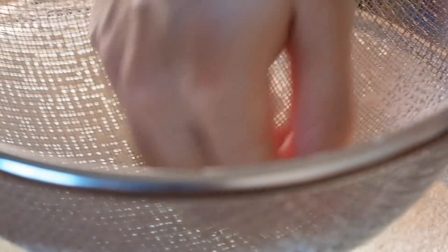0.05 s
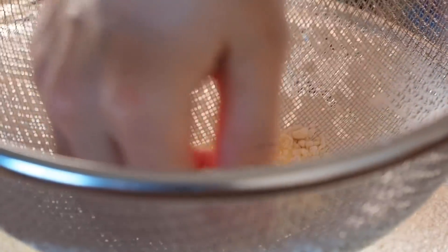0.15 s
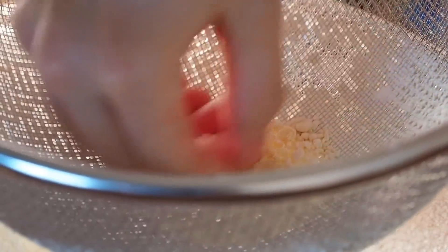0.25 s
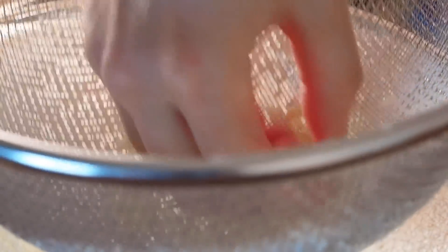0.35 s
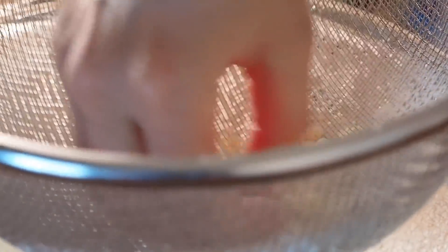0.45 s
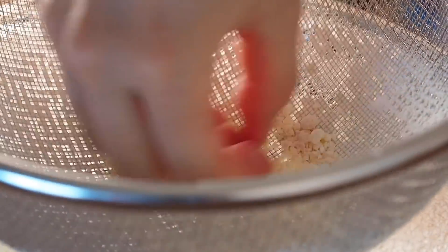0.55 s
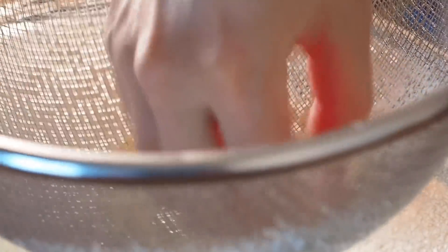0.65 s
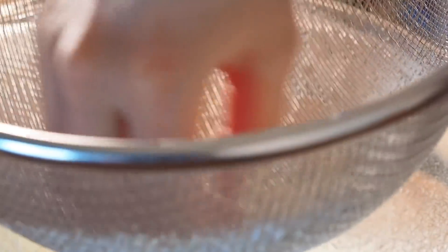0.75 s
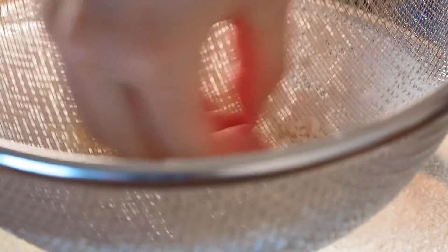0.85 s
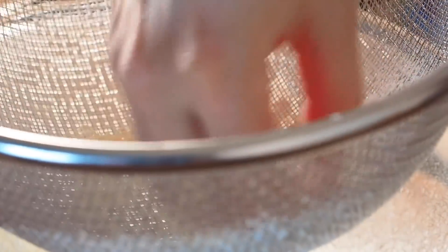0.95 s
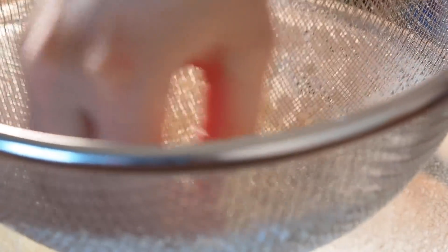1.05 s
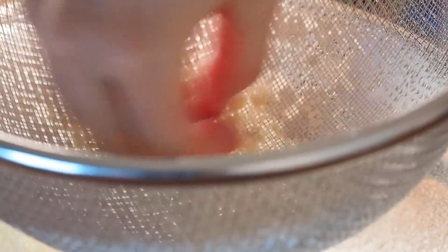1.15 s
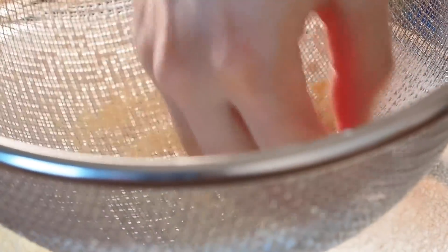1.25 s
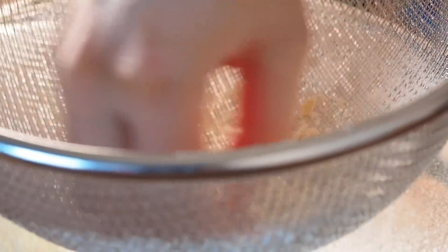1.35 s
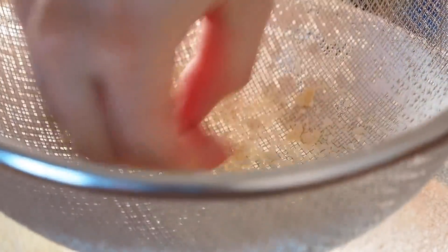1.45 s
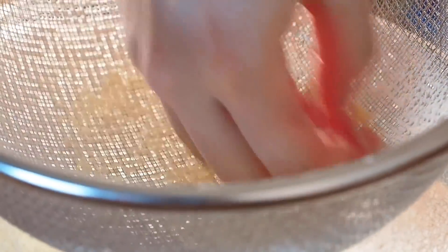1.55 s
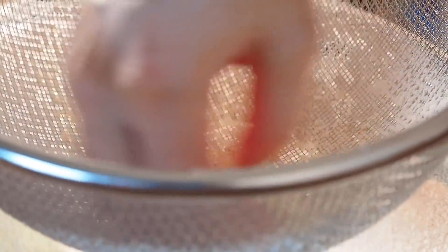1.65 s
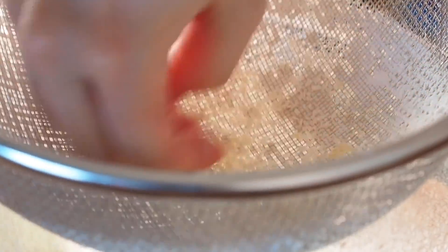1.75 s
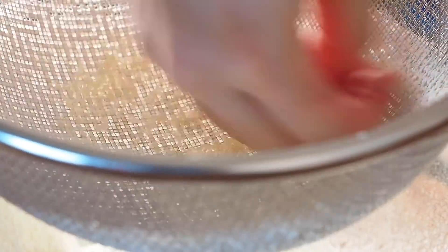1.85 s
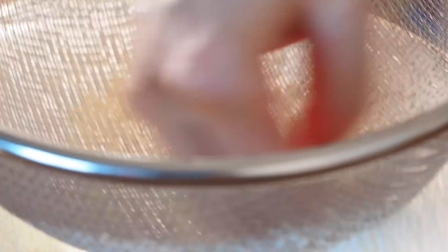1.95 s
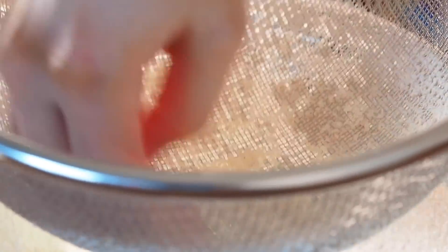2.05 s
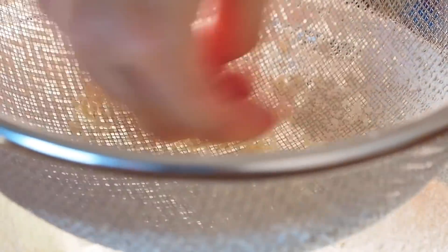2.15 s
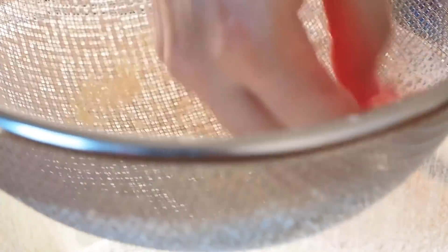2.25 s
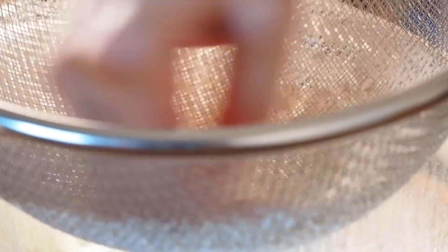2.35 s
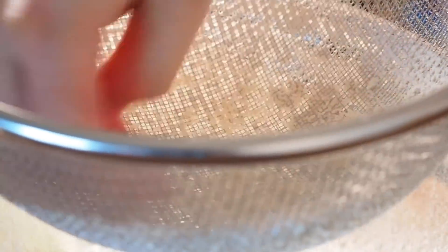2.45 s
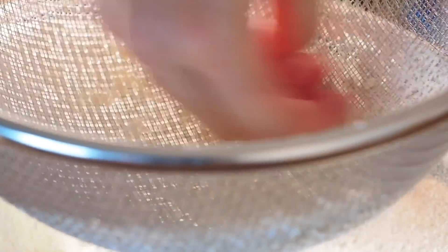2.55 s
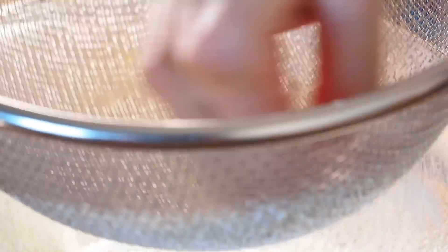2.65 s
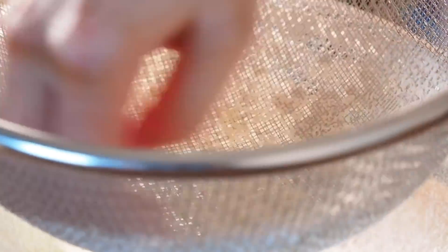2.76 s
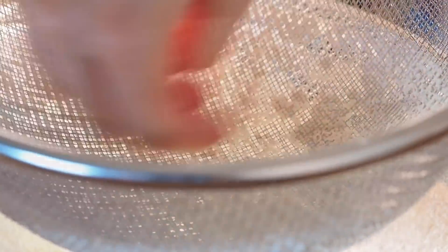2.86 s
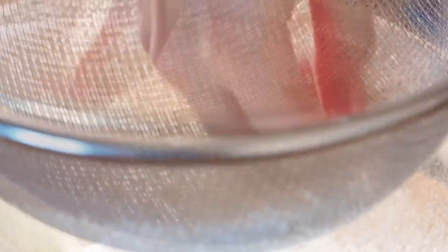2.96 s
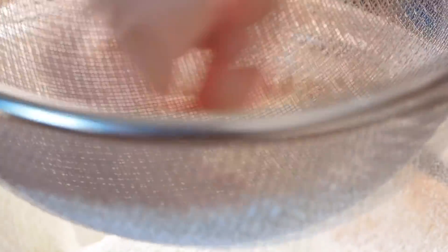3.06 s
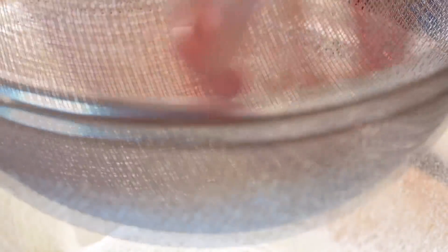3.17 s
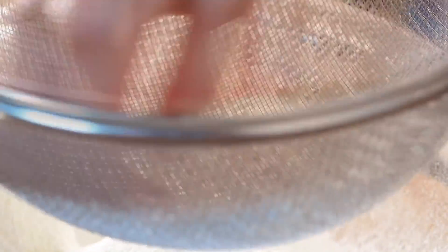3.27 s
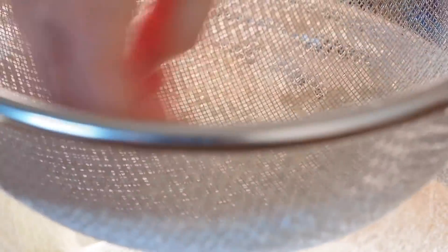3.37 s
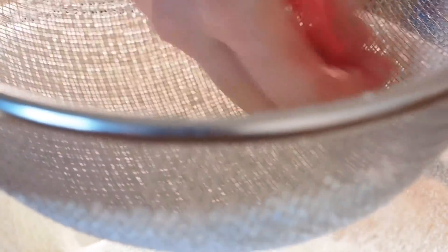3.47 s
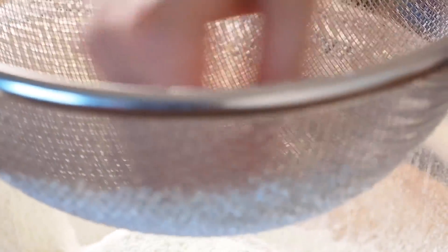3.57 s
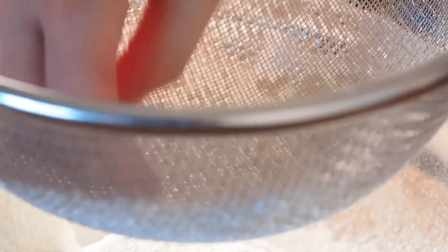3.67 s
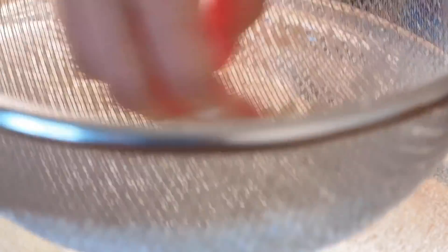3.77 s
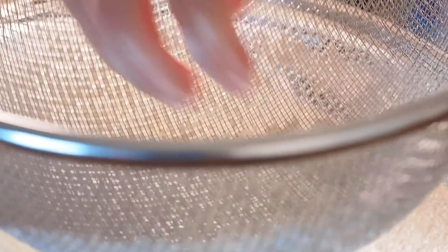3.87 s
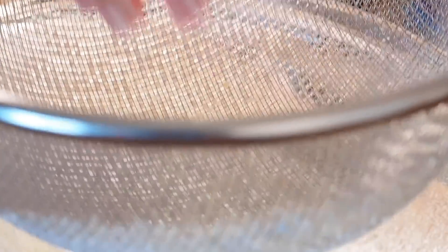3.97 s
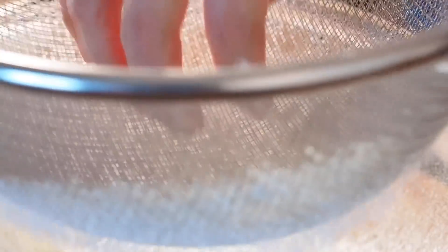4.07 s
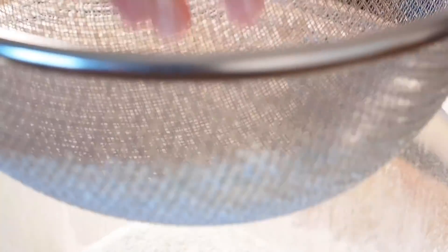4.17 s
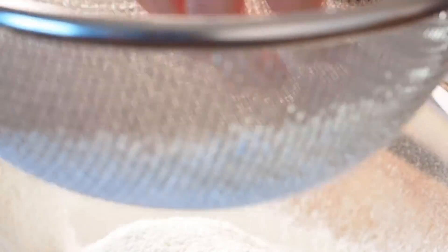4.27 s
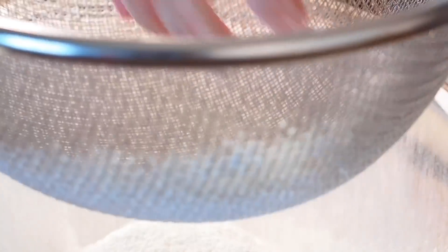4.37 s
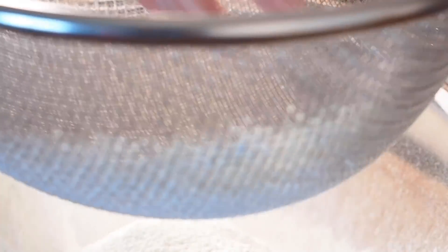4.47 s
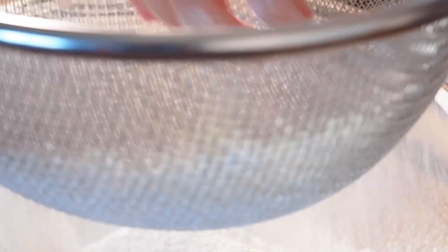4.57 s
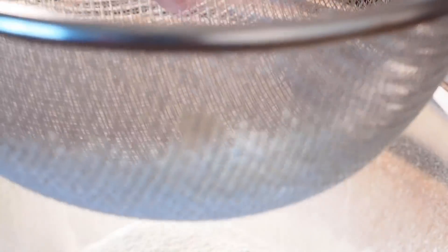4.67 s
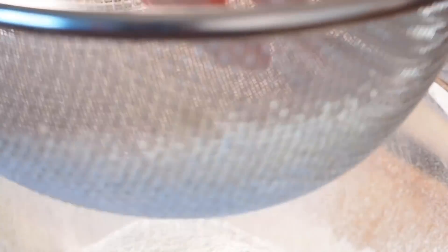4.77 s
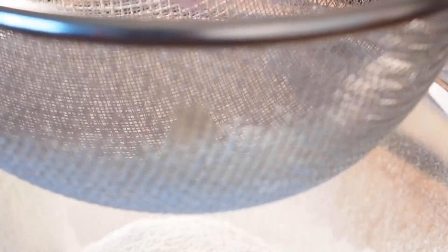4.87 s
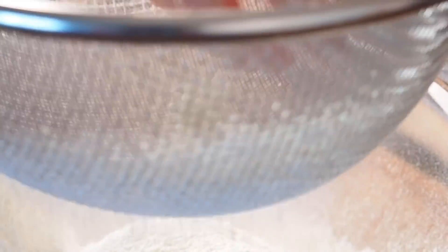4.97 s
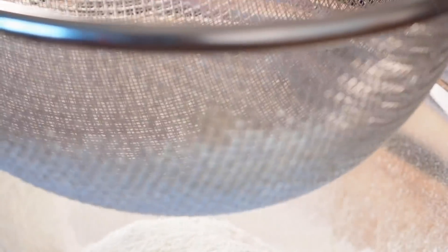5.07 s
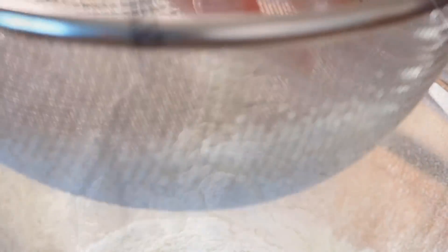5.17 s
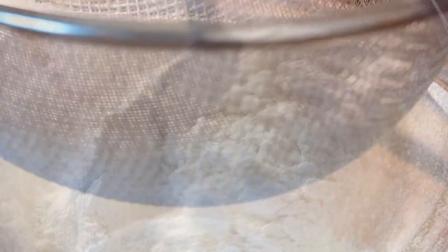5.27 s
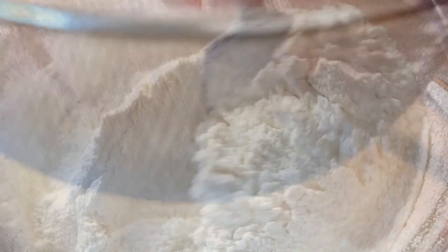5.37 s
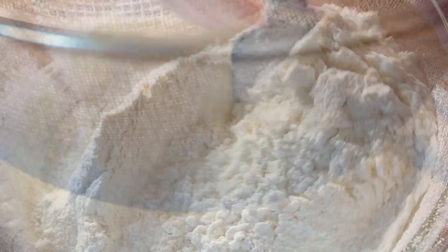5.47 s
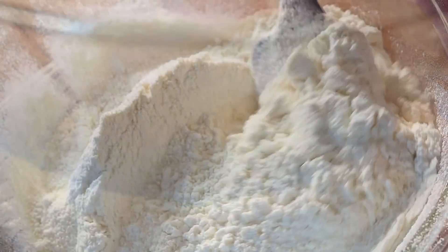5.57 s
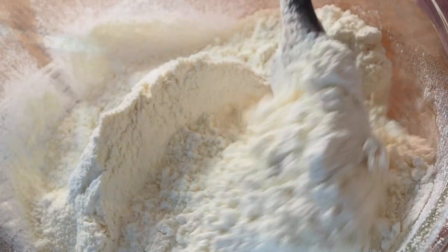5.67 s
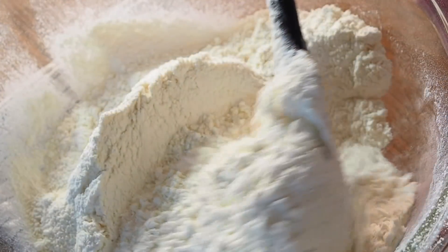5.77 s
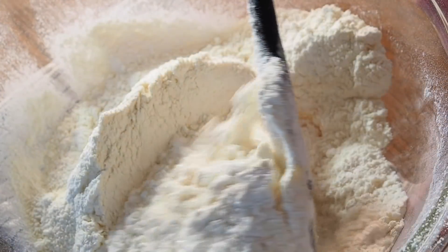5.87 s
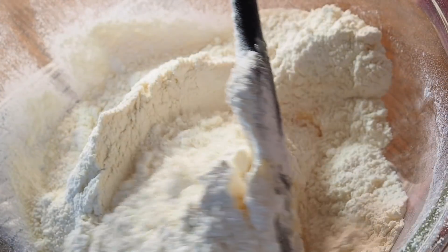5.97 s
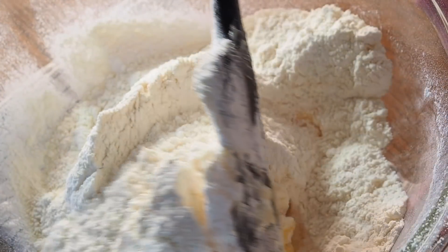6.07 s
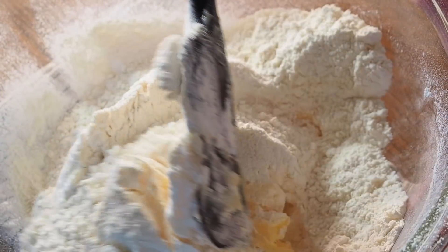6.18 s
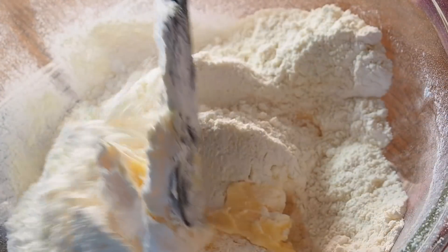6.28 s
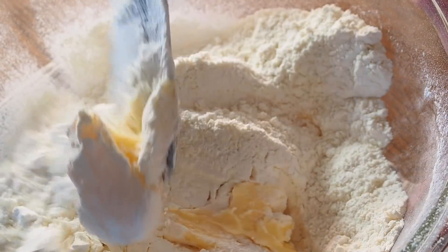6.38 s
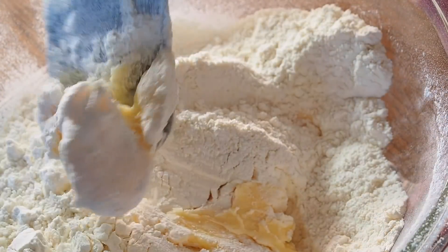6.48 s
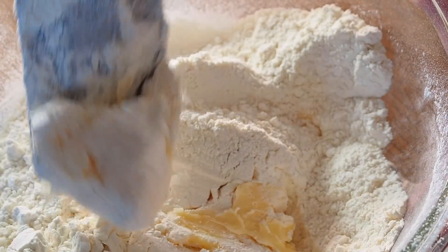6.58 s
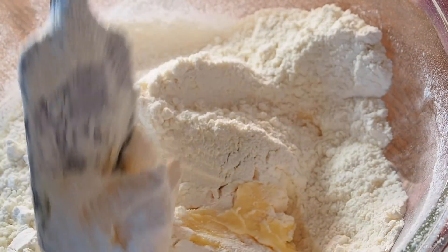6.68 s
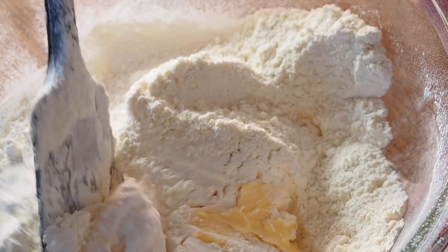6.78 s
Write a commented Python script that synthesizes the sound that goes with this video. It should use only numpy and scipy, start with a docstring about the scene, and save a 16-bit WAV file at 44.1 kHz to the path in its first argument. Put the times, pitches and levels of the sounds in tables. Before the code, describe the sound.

In a quiet kitchen, fingers rub the last lumps of flour through a fine wire sieve, very close to the microphone. About three soft strokes a second rasp, hiss and faintly buzz across the mesh. Then a hand pats the sieve nine times, louder and evenly, each a low thump with a crisp wire chatter. Powder sifts down faintly, and a spatula makes a few tiny scrapes.

```python
"""In a quiet kitchen, fingers rub the last lumps of flour through a fine wire sieve, very close by.
Sliding makes the mesh hiss, crushed flour rasps, and skin plucks the wires into a buzz.
Then a hand pats the sieve nine times: each pat pushes air, swings the mesh and makes its wires chatter.
Flour trickles down, and a few faint touches follow as a spatula starts to fold it into the batter."""
import sys
import numpy as np
from scipy import signal
from scipy.fft import rfft, irfft
from scipy.io import wavfile
from scipy.ndimage import uniform_filter1d

SR = 44100
rng = np.random.default_rng(int(sys.argv[2]) if len(sys.argv) > 2 else 0)


def int16_out(signal):
    """Quantize to a 16-bit WAV file."""
    q = np.round(np.clip(np.atleast_2d(signal).T, -1, 1) * 32767)
    wavfile.write(sys.argv[1], SR, q.astype(np.int16))


N = 301187
T = np.arange(N) / SR

# Firm pushes of the fingers across the mesh:
# start_s, hold_s, release_s, rasp_db, hiss_db, buzz_db, first_wires_per_s, slowing_octaves_per_s
PUSHES = [(.092, 0.047, 0.019, -60.5, -56, -43.5, 285, 0.66),
          (0.636, 0.031, 0.026, -49, -50, -43.5, 322, 0.26),
          (0.894, 0.066, 0.05, -48, -48.5, -48, 500, 13.5),
          (1.204, 0.078, 0.054, -47.5, -45.5, -50.5, 544, 7.6),
          (1.55, 0.036, 0.051, -46, -43.5, -46.5, 524, 11), (1.848, 0.046, 0.042, -46, -42, -51, 730, 8),
          (2.197, 0.058, 0.058, -47.5, -42, -42, 820, 15), (2.583, 0.047, 0.048, -49, -41, -44, 680, 15),
          (2.919, 0.052, 0.031, -47.5, -42, -49, 720, 7.4),
          (3.434, 0.063, 0.033, -48.5, -38.5, -42, 810, 8.8),
          (3.763, 0.059, 0.0048, -47.5, -40.5, -39, 740, 5)]
# Light drags between the pushes: start_s, length_s, rasp_db, hiss_db, buzz_db, wires_per_s
DRAGS = [(0.588, 0.064, -57.5, -56.5, -38, 178), (1.051, 0.24, -88, -66, -59.5, 373),
         (1.056, 0.076, -84, -83, -44.5, 82), (1.771, 0.047, -62.5, -75, -45.5, 320),
         (1.94, 0.13, -75, -46, -68, 540), (2.05, 0.065, -65, -43, -68, 520),
         (2.078, 0.12, -61.5, -54, -54.5, 390), (2.374, .14, -86, -48, -59, 310),
         (2.763, 0.12, -60.5, -43, -67, 450), (3.069, 0.16, -54.5, -67, -51, 560),
         (3.233, .15, -57.5, -49.5, -40, 171), (3.55, 0.095, -57.5, -40, -47.5, 450),
         (3.645, 0.14, -63.5, -59, -47.5, 93), (3.736, .09, -58, -50.5, -46, 290)]
# Pats of the hand on the sieve:
# start_s, chatter_db, thump_db, knock_db, swing_db, chatter_decay_s, powder_db, thump_lead_s
PATS = [(4.1072, -25.5, -12, -30, -19.5, 0.0037, -83, 0.00041),
        (4.341, -21, -13.5, -27, 2.5, 0.00075, -65, -0.0014),
        (4.574, -22.5, -14, -35, 1, 0.0011, -65, 0.0015),
        (4.7938, -24, -15.5, -34.5, 0.5, 0.002, -71.5, 0.0018),
        (5.0046, -18.5, -17, -31, 2.5, 0.00087, -62, 0.00068),
        (5.2155, -23, -17, -33, 2.5, 0.0017, -69.5, 0.00072),
        (5.4282, -22.5, -17.5, -34.5, 2, .0027, -65, .0005),
        (5.6439, -23, -19.5, -38.5, 0.5, 0.0018, -62, -0.0009),
        (5.8628, -36.5, -31.5, -50, -2.5, 0.002, -100, 0.0038)]
SWING_HZ = 100.5  # the mesh swings to and fro after a pat


def undb(db):
    """Turn decibels into a gain to multiply by."""
    return 10 ** (np.asarray(db) / 20)


def unit(x):
    """Scale a signal to an average strength (rms) of 1."""
    return x / np.sqrt(np.mean(x ** 2))


def curve(rows):
    """Join rows of time_s, value with straight lines."""
    return np.interp(T, *np.transpose(rows))


def colour(x, points):
    """Shape the tone of a sound by rows of pitch_hz, level_db."""
    hz, db = np.transpose(points)
    bins = np.maximum(np.fft.rfftfreq(N, 1 / SR), 1)
    return irfft(rfft(x) * undb(np.interp(np.log(bins), np.log(hz), db)), N)


def resonate(x, hz, width_hz):
    """Let a sound ring around one pitch."""
    return signal.lfilter(*signal.iirpeak(hz, hz / width_hz, SR), x)


def wander(rate):
    """A smooth random wobble of size 1 that changes about rate times a second."""
    span = max(int(SR / rate), 1)
    return unit(uniform_filter1d(uniform_filter1d(rng.standard_normal(N), span), span))


def grains(spread_db):
    """Noise of many tiny slips; more spread makes their sizes less equal."""
    return unit(rng.standard_normal(N) * undb(spread_db * wander(1500)))


def stereo_noise(tone, spread_db=0):
    """Shaped noise, alike left and right in the middle range and unrelated in the treble."""
    # Strength of the left-right contrast against the shared sound: pitch_hz, level_db
    width = [(60, -6), (200, -0.5), (700, -9.5), (2400, -18), (4400, -8), (8000, -2.5), (15000, -0.5)]
    mid, side = (unit(colour(grains(spread_db), tone)) for _ in range(2))
    side = colour(side, width)
    return np.array([mid + side, mid - side])


def pan(db):
    """Two gains that make the left louder than the right by db."""
    return undb(np.array([[db], [-db]]) / 2)


def burst(t, rise_s, decay_s):
    """A loudness shape that grows up to t = 0 and dies away after it."""
    return np.exp(-np.minimum(np.maximum(-t / rise_s, t / decay_s), 20))


def arch(start, length):
    """A smooth swell from 0 to 1 and back."""
    return np.sin(np.pi * np.clip((T - start) / length, 0, 1))


def scrapes(rows, noise, width_hz):
    """Short swells of ringing noise, from rows of start_s, length_s, pitch_hz, level_db."""
    return sum(unit(resonate(resonate(noise, hz, width_hz), hz, width_hz))
               * undb(db) * arch(start, length) for start, length, hz, db in rows)


def room(x, wet_db, fade_s, gap_s=0.0068, treble_hz=11000):
    """Add the echo of bowl, worktop and walls; it is duller and falls 60 dB in fade_s."""
    t = T[:SR // 2]
    tail = rng.standard_normal((2, len(t))) * undb(-60 * t / fade_s) * (t > gap_s)
    tail /= np.sqrt(np.sum(tail ** 2, axis=1, keepdims=True))
    tail = signal.lfilter(*signal.butter(2, treble_hz, fs=SR), tail)
    return x + undb(wet_db) * signal.fftconvolve(x, tail, axes=1)[:, :N]


def kitchen(hum_hz=147, hum_db=-80, noise_db=-63):
    """Quiet room noise, a wavering hum, and a low rumble of air stirred by the hand."""
    # Tones of the still room and of the moving air: pitch_hz, level_db
    room_tone = [(18, -33), (30, 12), (58, -2.5), (95, -29.5), (161, -15), (233, -23.5), (364, -21),
                 (554, -28.5), (616, -25.5), (1460, -38), (11400, -48.5), (12600, -52), (16000, -63)]
    air_tone = [(8, 7.5), (22, -7.5), (40, -16), (80, -19), (150, -25.5), (400, -36), (1500, -81.5)]
    # Strength of the moving air: time_s, level_db
    draught = [(0, -47), (1.2, -50.5), (2.5, -49.5), (3.2, -41.5), (3.9, -47), (5.6, -49), (5.95, -69.5),
               (6.8, -76)]
    hum_size = np.sqrt(2) * undb(hum_db + 6.2 * wander(23))
    hum = hum_size * np.sin(2 * np.pi * hum_hz * T + 0.81 * wander(10))
    still = stereo_noise(room_tone) * undb(noise_db) + hum
    return still * pan(-3.5) + stereo_noise(air_tone) * undb(curve(draught))


def dull_bumps():
    """A dull low thump comes as the sound starts; the later ones are the hand bumping the mesh."""
    # Dull low thumps: start_s, length_s, level_db
    bumps = [(0.002, 0.032, -27), (0.226, 0.017, -39.5), (0.619, 0.021, -27.5), (1.498, 0.068, -35),
             (2.093, 0.015, -40), (3.828, 0.019, -32), (5.078, 0.012, -37), (5.517, 0.026, -31.5),
             (5.574, 0.022, -40)]
    return sum(undb(db) * arch(start, length) ** 2 for start, length, db in bumps)


def push_shape(start, hold_s, release_s, attack_s=0.016):
    """The effort of one push sets in, holds and dies away."""
    t = T - start
    return np.clip(t / attack_s, 0, 1) * np.exp(-np.clip((t - hold_s) / release_s, 0, 20))


def finger_effort(turn_lead_s=0.046, turn_s=0.023, turn_db=-2.5, hiss_lingers=2.06):
    """Resting contact, pushes and drags add up to a sliding level and a pressing level, in dB."""
    # Hiss of fingers resting on the mesh, growing as the flour clears until they lift: time_s, level_db
    contact = [(0, -69), (.22, -71.5), (.31, -63), (.52, -66), (.85, -60), (1.5, -60.5), (2.55, -52),
               (3.2, -42.5), (3.82, -49), (3.95, -110)]
    # The hand turns round just before each push, and the hiss dips.
    turning = sum(arch(start - turn_lead_s, turn_s) for start, *_ in PUSHES)
    slide = undb(curve(contact) + turn_db * turning) ** 2
    press = slide * undb(-17) ** 2  # resting fingers barely rasp
    for start, hold_s, release_s, rasp_db, hiss_db, *_ in PUSHES:
        slide += (undb(hiss_db) * push_shape(start, hold_s, release_s * hiss_lingers)) ** 2
        press += (undb(rasp_db) * push_shape(start, hold_s, release_s)) ** 2
    for start, length, rasp_db, hiss_db, *_ in DRAGS:
        swell = arch(start, length)
        slide += (undb(hiss_db) * swell) ** 2
        press += (undb(rasp_db) * swell) ** 2
    return 10 * np.log10(slide), 10 * np.log10(press)


def rubbing(press_share=0.49):
    """Sliding makes the wires hiss, pressing crushes flour into a rasp, and both ring the bowl."""
    # Tones of the hissing wires and the rasping flour: pitch_hz, level_db
    hiss_tone = [(150, -11.5), (400, -7.5), (900, -24.5), (1150, -22), (1400, -33.5), (2100, -22.5),
                 (3000, -13.5), (5600, -14.5), (6900, -4), (8000, -2), (9800, -7), (11000, -10.5),
                 (11900, -9.5), (13000, -14.5), (16000, -19.5)]
    rasp_tone = [(80, -28), (200, 1), (330, 4.5), (700, 4), (1150, 5), (1350, -7), (1700, -2), (2600, -0.5),
                 (4200, -5), (7000, -19), (14000, -50)]
    # Ringing of the sieve's bowl and rim: pitch_hz, width_hz, level_db
    bowl_rings = [(375, 80, -5), (666, 50, 0), (1050, 80, -7), (1140, 60, 0), (1545, 30, -10),
                  (1680, 70, -12)]
    slide_db, press_db = finger_effort()
    buzz, plucks, overtones = wire_buzz()
    catch_db = 2 * wander(220) + 2 * plucks  # the skin catches and lets go
    hiss = stereo_noise(hiss_tone, spread_db=1) * undb(slide_db + catch_db / 2) * pan(0.42)
    rasp = stereo_noise(rasp_tone, spread_db=1.5) * undb(press_db + 1 + catch_db) * pan(-0.67)
    slips = grains(spread_db=5.6)
    ringing = unit(sum(undb(db) * resonate(slips, hz, width) for hz, width, db in bowl_rings))
    bowl = ringing * undb(press_share * press_db + (1 - press_share) * slide_db - 4) * pan(-3.5)
    overtones *= undb(press_db + 1)
    return hiss + rasp + bowl + buzz + overtones + scratches(rasp_tone) + lump_crunch()


def lump_crunch(pitch_hz=1830, lead_s=0.009, peak_s=1.5, fade_db_per_s=3.5):
    """Each push starts by crushing lumps: more as they gather, fewer as they run out."""
    rows = []
    for start, hold_s, _, rasp_db, *_ in PUSHES:
        level_db = rasp_db - 1.5 - fade_db_per_s * abs(start - peak_s)
        rows.append((start - lead_s, 1.37 * hold_s, pitch_hz, level_db))
    grit = stereo_noise([(1000, 0.018), (4000, 0)], spread_db=4.5)
    return scrapes(rows, grit, width_hz=1350)


def finger_glides(grip_s=0.0014, slowest_hz=226, judder_below_hz=230, waver=0.06, judder=0.56):
    """Give each move's swell, wires per second, level and unsteadiness; pushes slow, drags speed up."""
    for start, hold_s, release_s, _, _, db, hz, slowing in PUSHES:
        rate = hz * 2 ** (-slowing * np.maximum(T - start, 0))
        swell = arch(start + grip_s, hold_s + 1.77 * release_s)
        yield swell, np.maximum(rate, slowest_hz), db, waver
    for start, length, _, _, db, hz in DRAGS:
        from_middle_s = np.clip(T - start, 0, length) - length / 2
        rate = hz * 2 ** (1.5 * from_middle_s)  # up 1.5 octaves a second
        unsteady = judder if hz < judder_below_hz else waver  # slow skin sticks and slips
        yield arch(start, length), rate, db, unsteady


def wire_buzz(flutter_db=3.5, bowl_top_hz=1245):
    """Skin plucks one wire after another, giving a buzz, a plucking rhythm and rough overtones."""
    tone, plucks = 0, 0
    wobble = wander(251.6)
    roughness = [wander(260) for _ in range(2)]
    for swell, hz, db, unsteady in finger_glides():
        phase = 2 * np.pi * np.cumsum(hz * np.exp(unsteady * wobble)) / SR
        tone += undb(db) * swell * np.sin(phase)
        plucks += swell * np.exp(1j * phase)  # one turn for each wire crossed
    overtones = sum(np.abs(plucks) * noise * np.cos(multiple * np.angle(plucks))
                    for multiple, noise in enumerate(roughness, 2))
    overtones = signal.lfilter(*signal.butter(6, bowl_top_hz, fs=SR), overtones)  # the bowl dulls them
    buzz = tone * undb(flutter_db * wander(147)) * pan(-4.5)
    return buzz, np.real(plucks), overtones


def scratches(tone, pitch_hz=3530, lag_s=0.015):
    """The fingers make a thin scratch as each push eases, and all through each drag."""
    easing = [(start + hold_s + lag_s, 2.03 * release_s, pitch_hz, hiss_db - 13)
              for start, hold_s, release_s, _, hiss_db, *_ in PUSHES]
    dragging = [(start, length, pitch_hz, hiss_db - 14) for start, length, _, hiss_db, *_ in DRAGS]
    return scrapes(easing + dragging, stereo_noise(tone), width_hz=1500)


def pat_thumps(puff_s=0.0038, backflow_s=0.045, swing_fade_s=0.053):
    """Each pat pushes a puff of air that flows back slowly; mesh and frame swing briefly."""
    # Ringing of the sieve's frame: pitch_hz, level_db, fade_s (time to fall 60 dB)
    frame_rings = [(161.4, -12, 0.051), (195, -20.5, 0.1), (259, -29, 0.026)]
    t = T[:SR // 4]
    puff = undb(-3) * (t / puff_s * np.exp(1 - t / puff_s)) ** 2
    backflow = undb(-13) * arch(puff_s, backflow_s)[:len(t)] ** 2 * pan(6.3)
    frame = sum(undb(db - 60 * t / fade_s) * np.sin(2 * np.pi * hz * t)
                for hz, db, fade_s in frame_rings) * pan(3)
    soft_contact = 1 - np.exp(-t / 0.012)
    mesh_gives = 1 - np.exp(-t / 0.002)
    out = np.zeros((2, N))
    for start, _, db, _, swing_db, _, _, lead_s in PATS:
        swing = undb(swing_db - 60 * t / swing_fade_s) * np.sin(2 * np.pi * SWING_HZ * t) * pan(-8)
        thump = puff - backflow + swing * mesh_gives + frame * soft_contact
        first = int((start - lead_s) * SR)
        out[:, first:first + len(t)] += undb(db) * thump
    return out


def wire_chatter(rise_s=0.00093, knock_extra_s=0.0059):
    """The wires clash at each pat, again as the mesh swings back, then settle; the bowl knocks dully."""
    # Tones of the clashing wires and the knocked bowl: pitch_hz, level_db
    chatter_tone = [(400, -16.5), (1400, -31.5), (2000, -29), (2600, -14.5), (3700, -20.5), (4700, -13),
                    (5900, -12.5), (7000, -4), (7860, -2), (9300, -7), (10700, -13.5), (11800, -13.5),
                    (13500, -18), (16000, -22)]
    knock_tone = [(100, -1), (240, 4), (350, -10), (480, -2), (660, -2), (900, -13), (1180, -8.5),
                  (1450, -16), (3000, -16), (8000, -36.5)]
    wires, bowl = 0, 0
    for start, db, _, knock_db, _, decay_s, *_ in PATS:
        t = T - start
        clash = burst(t - 0.001, rise_s, decay_s)
        rebound = undb(-19) * burst(t - 1 / SWING_HZ, rise_s=0.00067, decay_s=0.008)
        settle = undb(-20) * burst(t - 0.002, rise_s, decay_s=0.012)
        wires += undb(db) * (clash + rebound + settle)
        bowl += undb(knock_db) * burst(t - 0.001, rise_s, decay_s + knock_extra_s)
    return stereo_noise(chatter_tone) * wires * pan(1) + stereo_noise(knock_tone) * bowl * pan(-0.91)


def powder_and_hiss(fall_s=0.08):
    """Each pat shakes powder loose, which sifts down with a faint hiss; two longer hisses join in."""
    # Longer faint swells of high hiss, the first probably the hand brushing the mesh:
    # start_s, length_s, level_db
    hiss_swells = [(5.275, 0.19, -73), (5.502, 0.16, -81)]
    # Tone of the hiss: pitch_hz, level_db
    tone = [(2000, -25), (5500, -13.5), (7000, -0.5), (8800, -1.5), (11000, -14.5), (16000, -29.5)]
    shaken = sum(undb(db) * burst(T - start - fall_s, rise_s=0.012, decay_s=0.046)
                 for start, *_, db, _ in PATS)
    swells = sum(undb(db) * arch(start, length) for start, length, db in hiss_swells)
    return stereo_noise(tone, spread_db=3) * (shaken + swells)


def crumbs_and_spatula():
    """Crumbs of flour and the spatula make tiny, soft scrapes."""
    # Soft touches: start_s, length_s, pitch_hz, level_db
    touches = [(5.378, 0.022, 8540, -57.5), (5.558, 0.02, 8100, -64), (5.693, 0.11, 2060, -66.5),
               (5.806, 0.017, 8200, -64), (6.005, .008, 7400, -82), (6.226, 0.0071, 6930, -80),
               (6.452, 0.007, 2910, -76), (6.495, 0.0033, 3990, -56.5), (6.495, 0.058, 4050, -78.5),
               (6.66, 0.0046, 7890, -76)]
    grit = stereo_noise([(300, 28), (1000, 6), (8000, -1), (16000, -5)], spread_db=4.5)
    return scrapes(touches, grit, width_hz=2500)


def scene():
    """The sieve close by, with a little of the kitchen around it."""
    rubs = room(rubbing(), wet_db=-15, fade_s=0.2)
    chatter = room(wire_chatter(), wet_db=-15, fade_s=0.23)
    thumps = room(dull_bumps() + pat_thumps(), wet_db=-24.5, fade_s=0.16)
    return rubs + chatter + thumps + powder_and_hiss() + crumbs_and_spatula() + kitchen()


def record(dry):
    """Cut away the highest treble, above 15900 Hz."""
    return signal.sosfilt(signal.ellip(10, 0.2, 80, 15900, fs=SR, output="sos"), dry)


dry = scene()
out = record(dry)
int16_out(out)
```